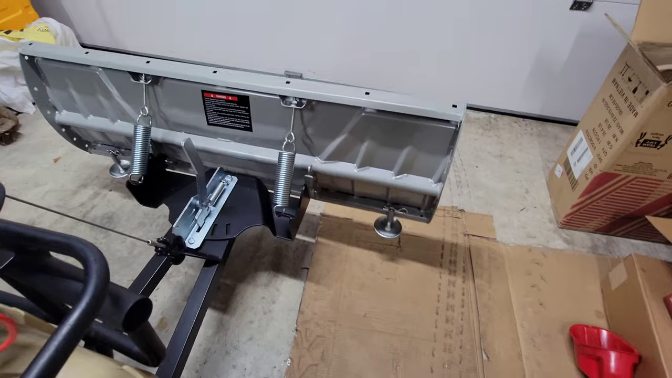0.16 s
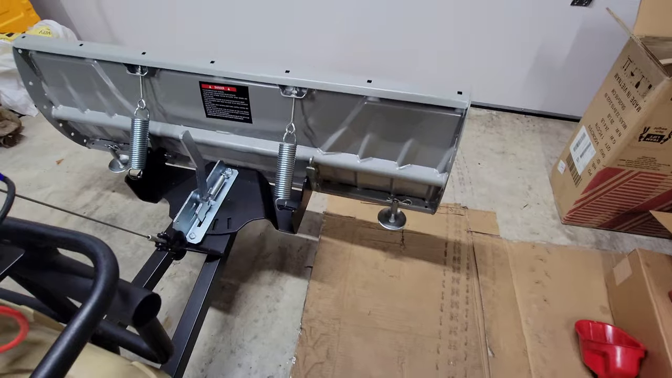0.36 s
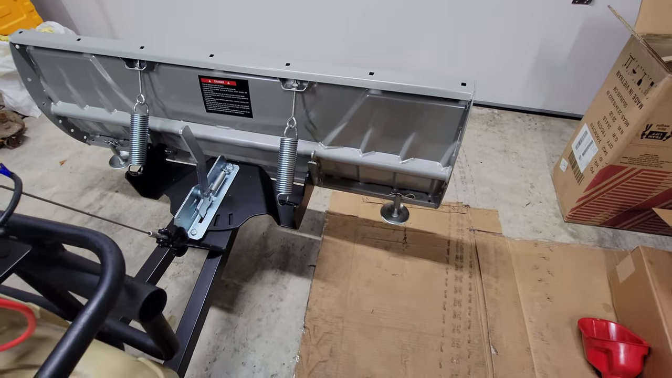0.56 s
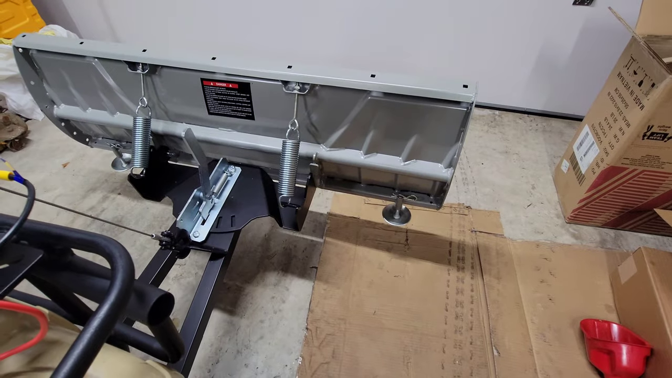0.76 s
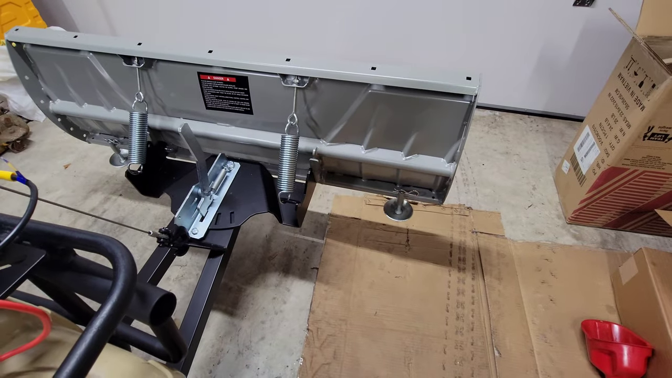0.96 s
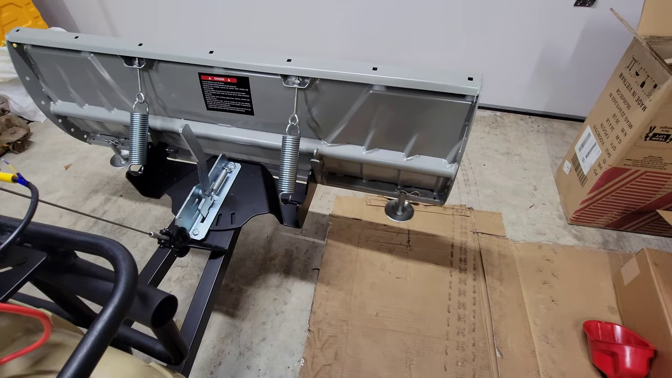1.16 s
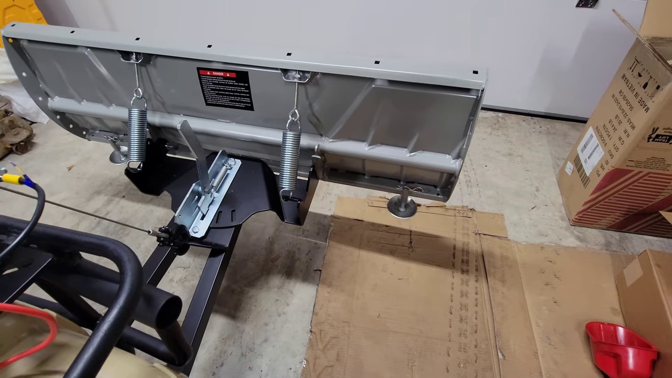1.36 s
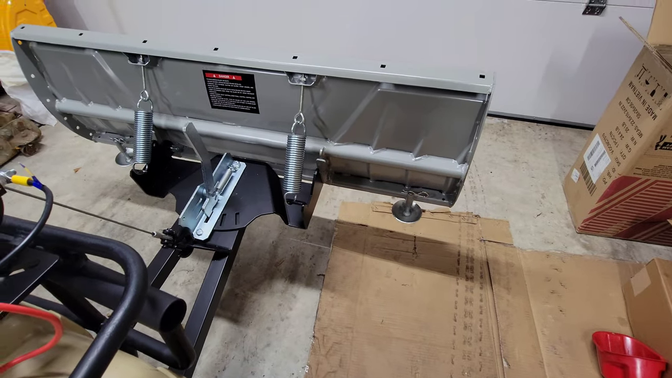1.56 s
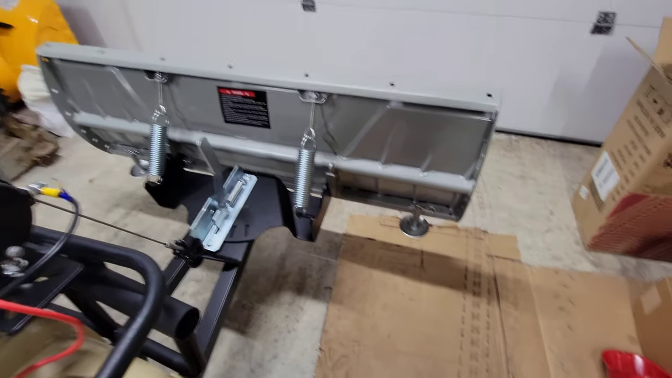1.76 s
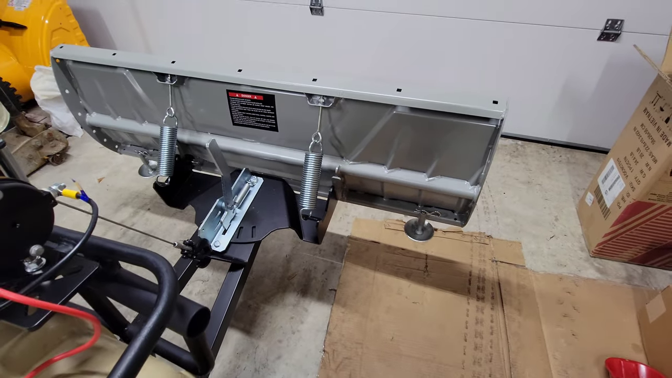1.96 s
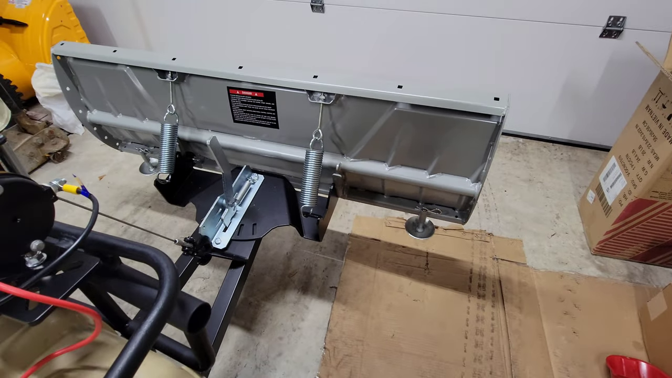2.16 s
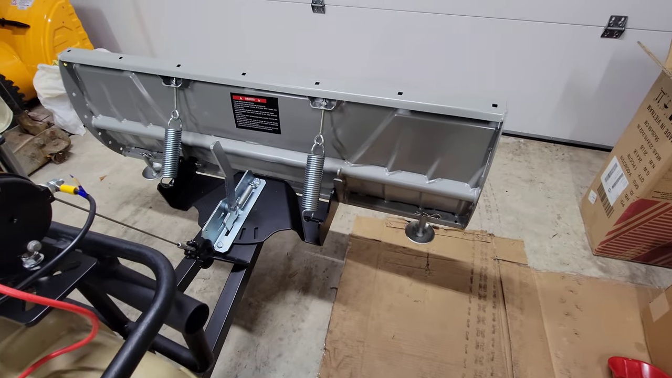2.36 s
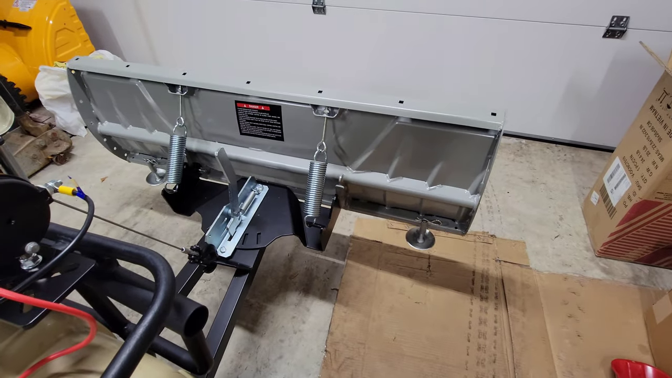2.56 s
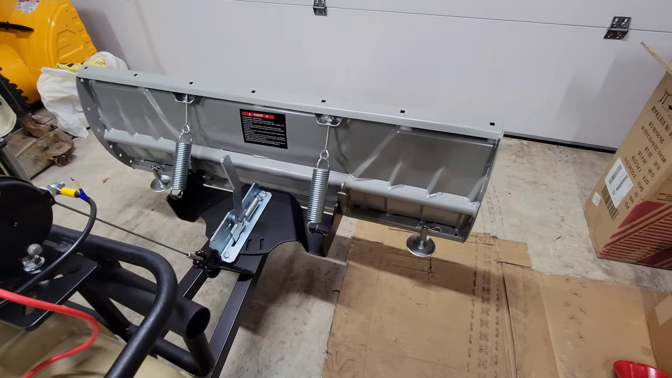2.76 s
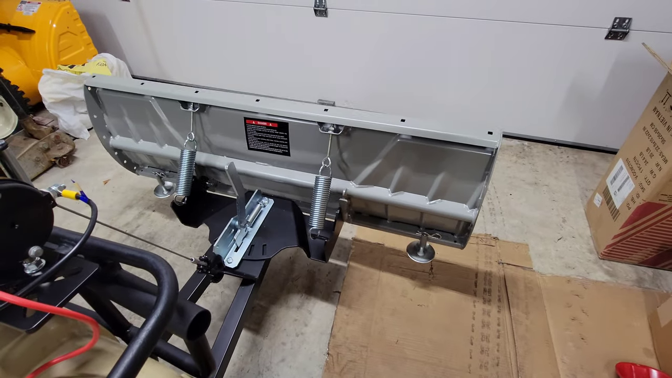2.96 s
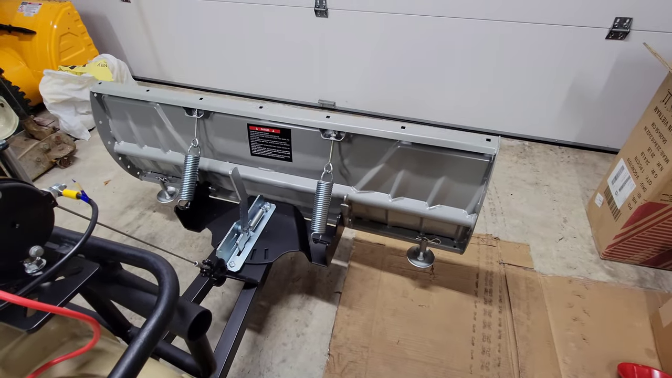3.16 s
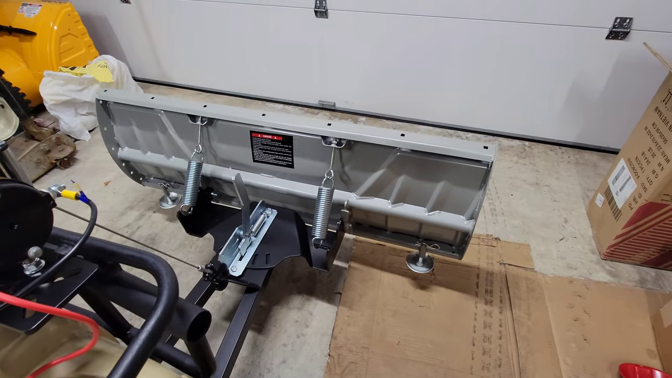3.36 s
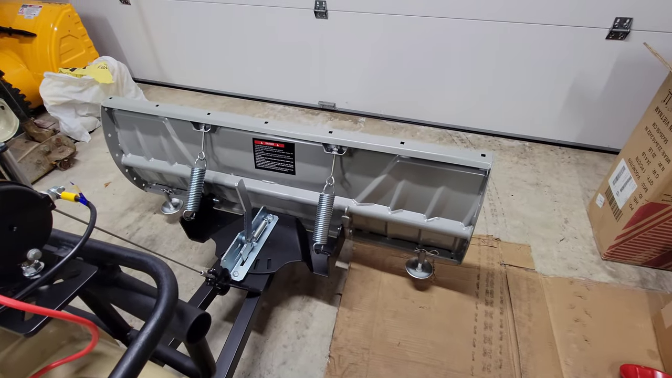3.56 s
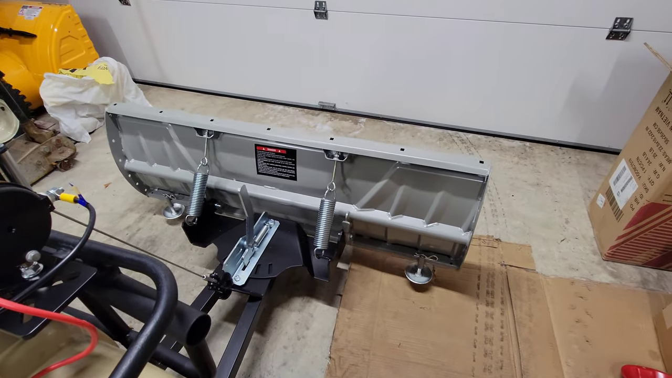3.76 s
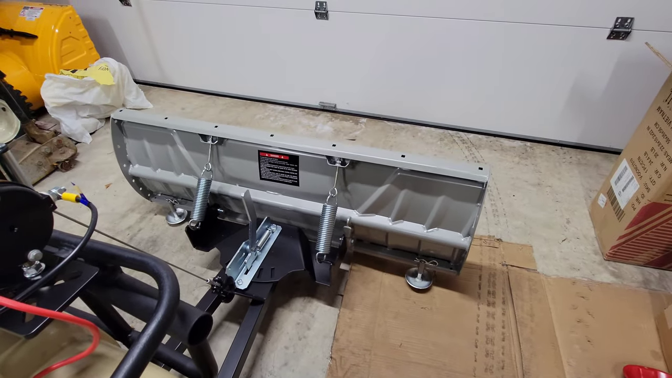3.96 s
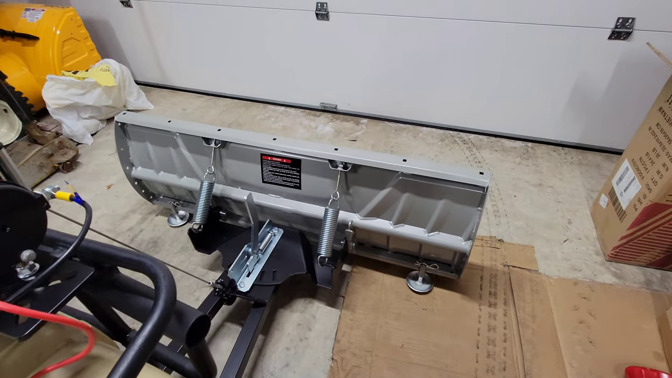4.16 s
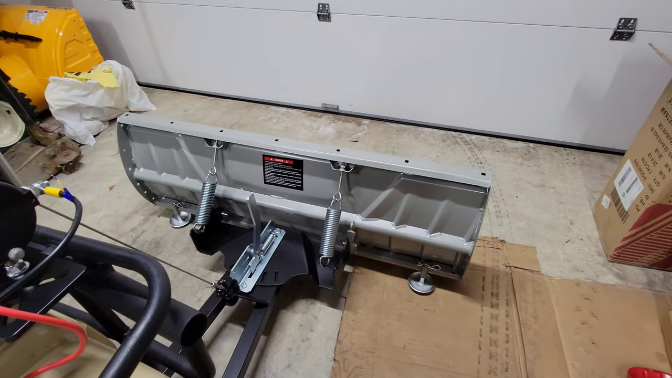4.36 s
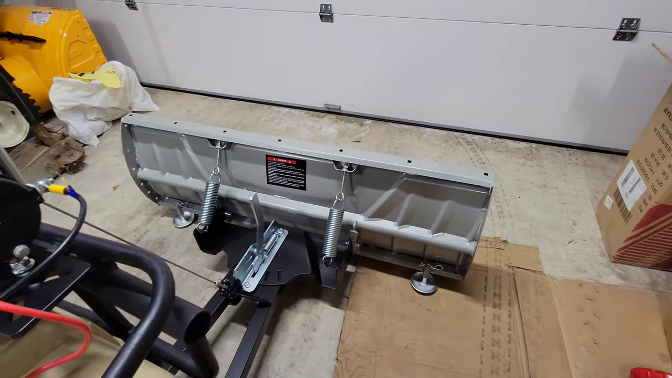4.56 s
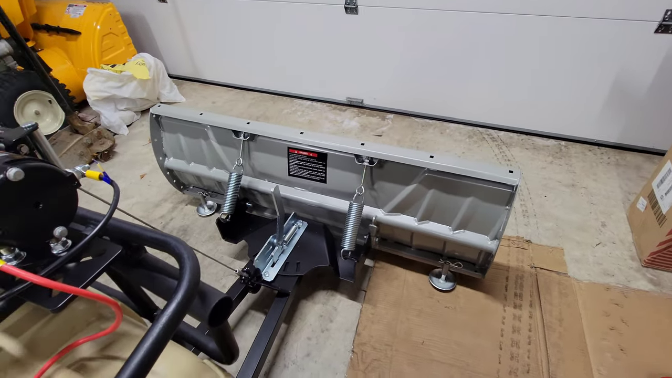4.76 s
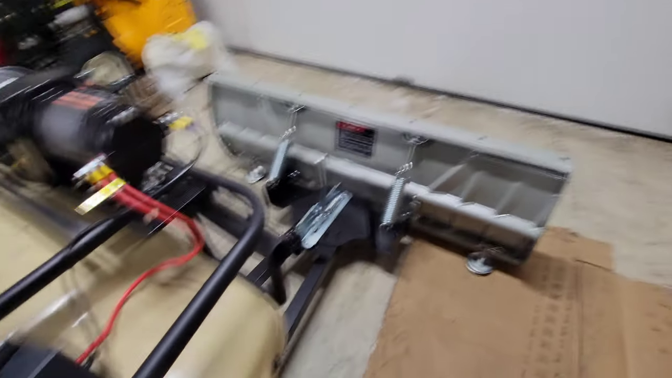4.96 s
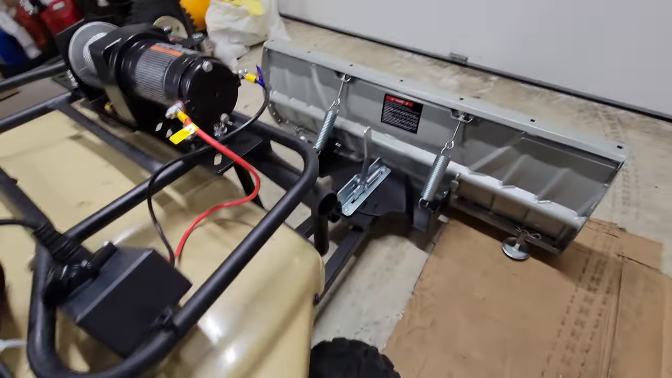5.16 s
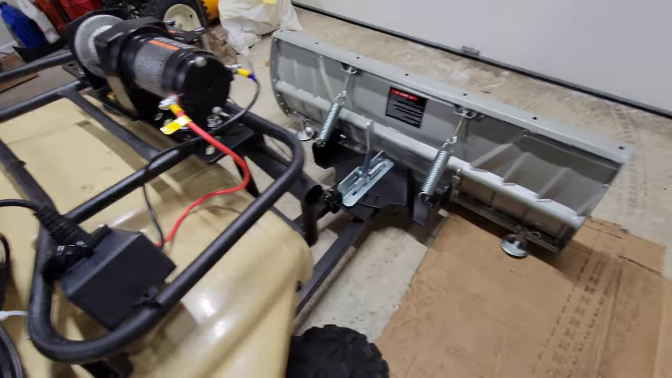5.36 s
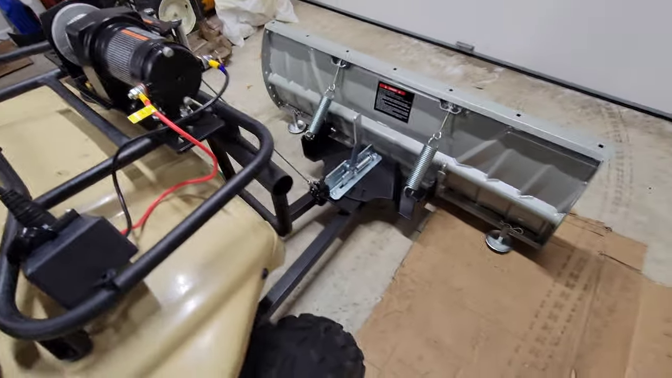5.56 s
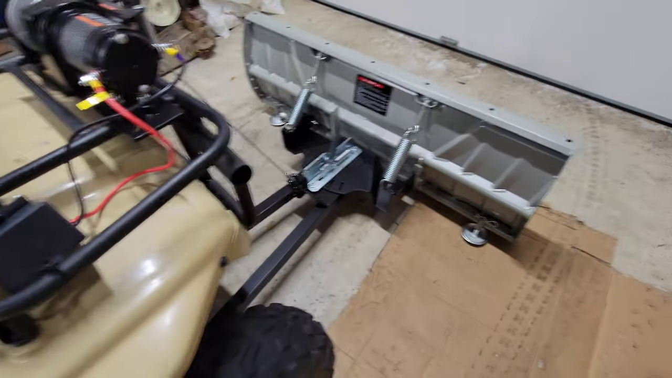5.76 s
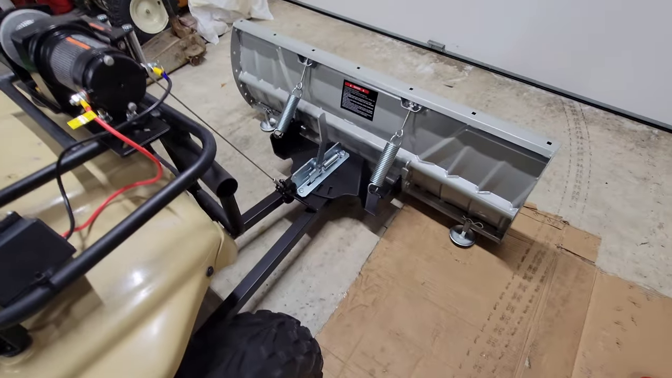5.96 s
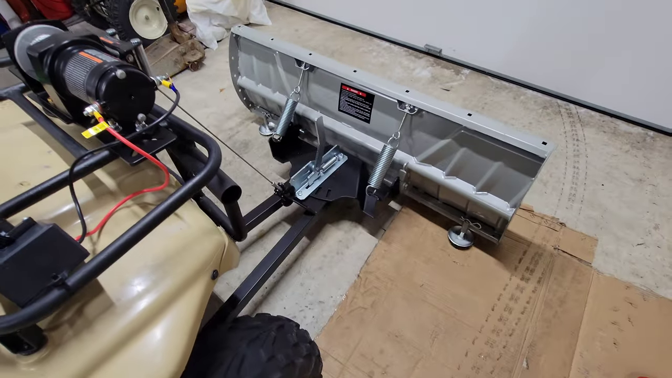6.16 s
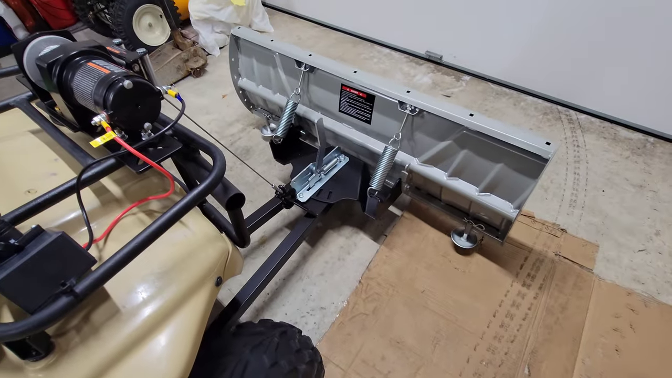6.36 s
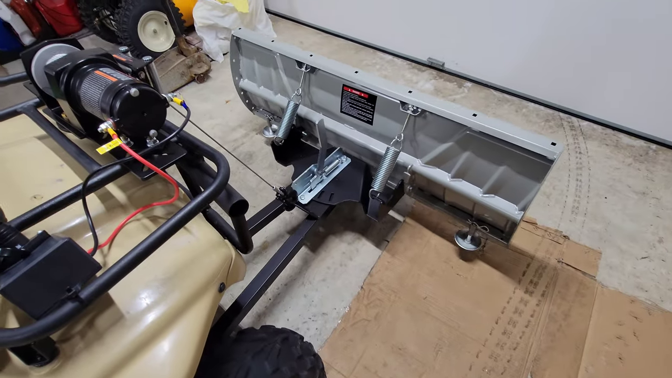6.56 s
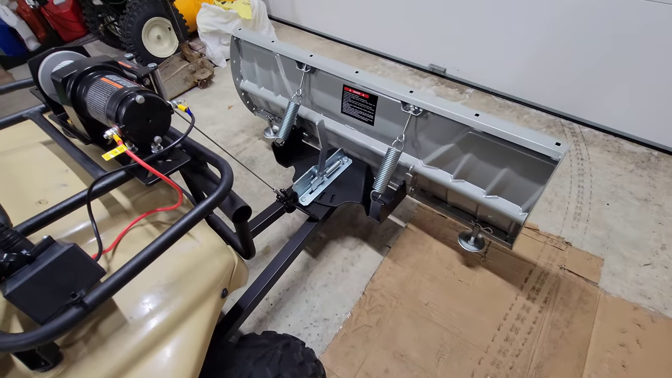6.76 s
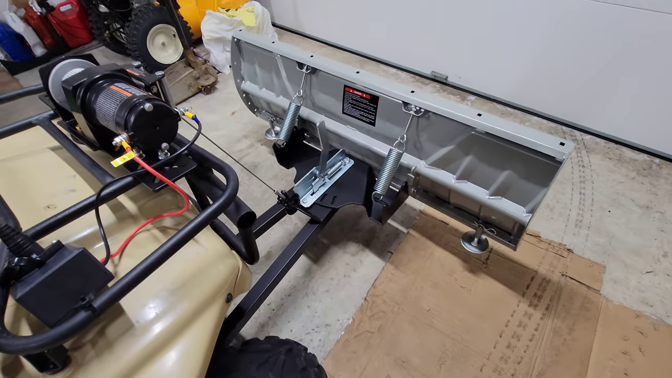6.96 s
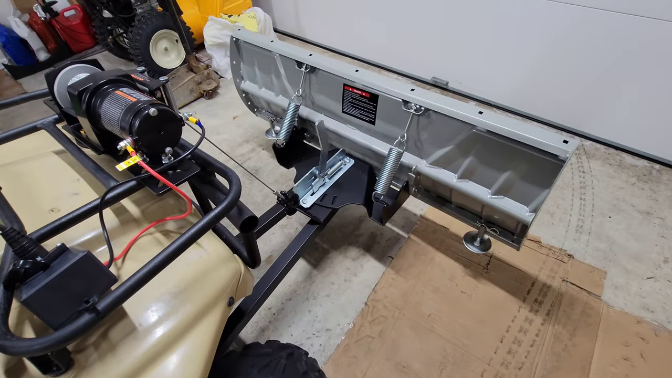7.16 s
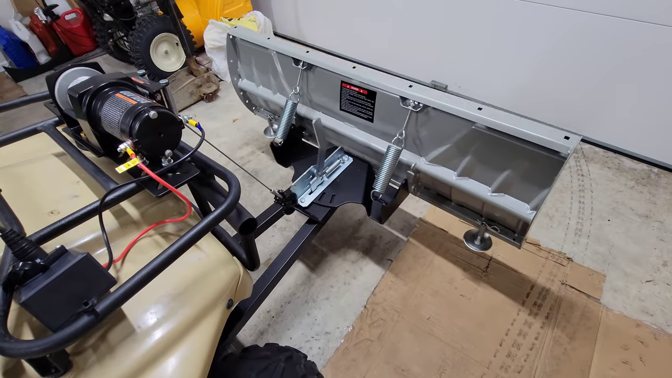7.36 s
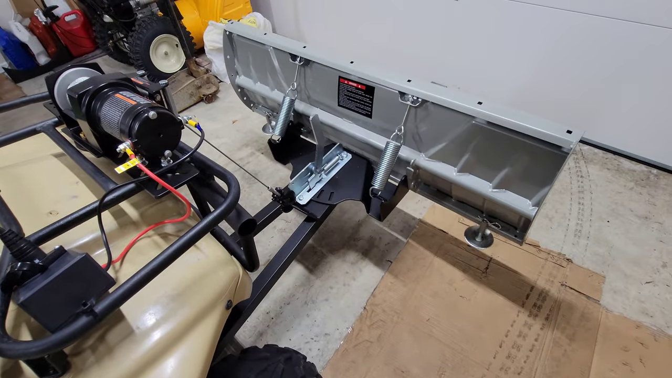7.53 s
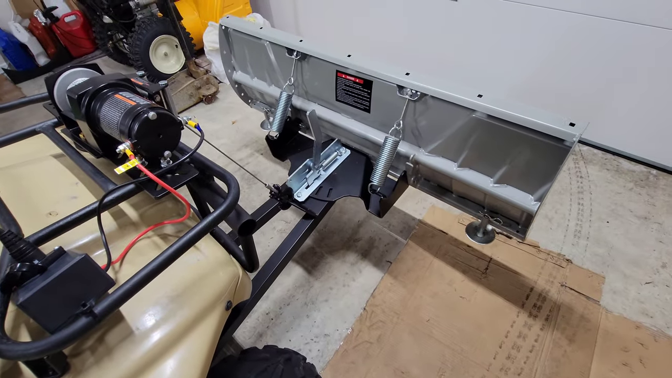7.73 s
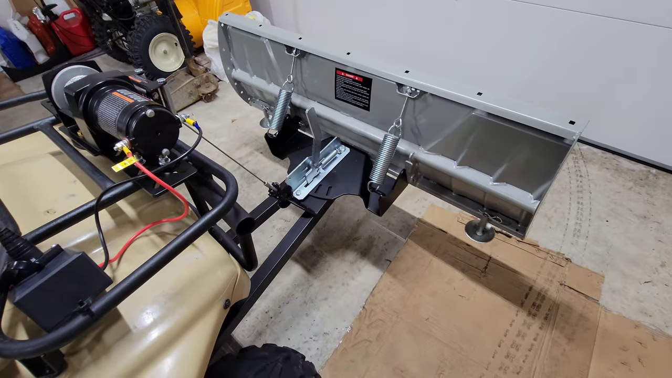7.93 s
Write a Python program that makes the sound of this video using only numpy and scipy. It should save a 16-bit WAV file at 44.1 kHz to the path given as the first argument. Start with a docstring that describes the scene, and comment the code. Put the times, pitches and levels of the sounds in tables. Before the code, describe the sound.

Quiet garage air, then at 0.2 s a tiny switch tick and hard contactor clack start an electric winch. Its whine sweeps up quickly into buzzing, gritty planetary-gear grinding, braking by about 0.65 s with a dull thud and reverberation. Similar shorter bursts come at 0.8-1.15 and 1.25-1.6 s, with a brief squeak in the last. After a fading echo, a longer lowering run starts at 2.25 s, slightly lower in pitch, throbbing and surging with rasps. At 4.15 s the steel blade lands on concrete in quick crunching, ringing contacts; the motor lightens to a cleaner whine and stops at 4.5 s. Near quiet follows, with a faint soft step at 5.15 s. At 5.87 s another clack begins a long lift, starting faster and lighter, settling into steady harsh whirring and dry scraping until power cuts at 7.8 s. Close handheld stereo, hard bare room.

```python
"""An electric winch on a quad bike moves a steel plow blade in a garage: three short lifts, one lowering, one long lift.
Each run starts with the clack of the contactor; shaft harmonics sweep up, whine and throb, and noise clashing
once a turn grinds like planetary gears until the motor brakes.
The blade, a set of decaying modes with a crunch, lands on the concrete floor near the end of the lowering.
Noise echoes with a decay of their own in each band make the bare room ring after every stop, over quiet air."""
import sys
import numpy as np
from scipy import signal
from scipy.fft import rfft, irfft, next_fast_len
from scipy.io import wavfile
from scipy.ndimage import map_coordinates

SR = 44100
rng = np.random.default_rng(int(sys.argv[2]) if len(sys.argv) > 2 else 0)


def store_pcm(level_fs):
    """Save levels as 16-bit WAV."""
    pcm = np.round(np.clip(level_fs, -1, 1) * 32767).astype(np.int16)
    wavfile.write(sys.argv[1], SR, np.atleast_2d(pcm).T)


N = 352468
T = np.arange(N) / SR  # seconds

# Motor runs. Each row: power on and off in seconds, spin-up time constant and braking time in seconds,
# direction (0 winding in, 1 paying out), nominal shaft speed in Hz, then relative levels in dB of the gears,
# whine against grinding, mount, scraping and upper whine harmonics, and the lead of the left port in ms.
RUNS = [(0.196, 0.551, 0.05, 0.14, 0, 341.7, -18.5, -2, -27.5, -38.5, -4, 0.4),
        (0.78, 1.05, 0.047, 0.128, 0, 339.6, -19, -3, -28.5, -37, -1.5, 0.4),
        (1.25, 1.457, 0.047, 0.17, 0, 341, -20.5, -1.5, -28, -32.5, -1, 0.39),
        (2.265, 4.52, 0.046, 0.045, 1, 319.7, -21.5, -3.5, -28.5, -45, 0, 0.59),
        (5.873, 7.818, 0.039, 0.13, 0, 337.8, -19.5, -3, -31, -41.5, -0.5, 0.3)]
# Skid shoes and blade edge touching the floor. Each row: start in seconds, relative level in dB.
LANDING = [(4.146, -11), (4.166, -13.5), (4.189, -18), (4.235, -28.5)]
# Housing rattled by the teeth while winding in. Each row: frequency in Hz, relative density in dB per Hz.
GRIND_IN = [(250, -83.5), (550, -3.5), (800, -1.5), (1300, 1.5), (2000, -1.5), (2500, -2.5), (3150, 2),
            (4200, -5), (5000, -4), (6500, -8.5), (8300, -20), (12000, -15.5), (15500, -41.5)]
# Dry scraping of drum and cable. Each row: frequency in Hz, relative density in dB per Hz.
SCRAPE = [(2500, -25), (5000, -4), (7000, -1.5), (8400, -6.5), (10500, -11.5), (12200, -5.5), (13500, -12),
          (15500, -20.5)]
# Vibration of the mount and rack. Each row: frequency in Hz, relative density in dB per Hz.
MOUNT = [(25, -48.5), (48, -40), (65, 0), (110, -5.5), (170, -7.5), (260, -1.5), (320, 4), (420, 1),
         (600, -8), (1000, -6.5), (2500, -65.5)]
# Quiet room air. Each row: frequency in Hz, relative density in dB per Hz.
AIR = [(25, -16), (50, -9), (90, 6), (140, 1), (320, -3), (500, -10.5), (1000, -16), (2000, -18.5),
       (4000, -25.5), (8000, -44.5), (15000, -49.5)]
TURNS_PER_ROUND = 16  # shaft turns in one round of the planet carrier


def amp(db):
    """Decibels to gain."""
    return 10 ** (np.asarray(db) / 20)


def unit(x):
    """Scale to rms 1."""
    return x / np.sqrt(np.mean(x ** 2) + 1e-20)


def along(points, hz):
    """Rows of frequency in Hz and value, read on a log frequency axis."""
    f, v = np.transpose(points)
    return np.interp(np.log(hz + 1), np.log(f + 1), v)


def wobble(rate):
    """A smooth random curve, rate knots a second."""
    coarse = T[::32]
    knots = rng.standard_normal(4096)
    curve = map_coordinates(knots, [coarse * rate], mode="wrap")
    return np.interp(T, coarse, curve)


def filtered(x, response):
    """x times a response of frequency."""
    m = next_fast_len(N + SR // 4)
    hz = np.fft.rfftfreq(m, 1 / SR)
    return irfft(rfft(x, m) * response(hz), m)[..., :N]


def coloured(spectrum, gate=1):
    """Gated noise through a spectrum, scaled to rms 1."""
    noise = gate * rng.standard_normal(N)
    return unit(filtered(noise, lambda hz: amp(along(spectrum, hz))))


def fade(t, t60):
    """Exponential decay by 60 dB in t60 seconds."""
    return np.exp(-np.log(1000) * t / t60)


def ring(modes, t):
    """Decaying modes, struck at new strengths and phases each time."""
    out = 0
    for hz, db, t60 in modes:
        strength = amp(db + 2 * rng.normal())
        out = out + strength * fade(t, t60) * np.sin(2 * np.pi * (hz * t + rng.random()))
    return out


def add(track, s, sound):
    """Mix a sound in at s seconds."""
    start = round(s * SR)
    track[start:start + len(sound)] += sound[:N - start]


def swells(events):
    """Bell-shaped swells of gain from rows of centre in seconds, level in dB and half-length in seconds."""
    return sum(amp(db) * np.exp(-2 * ((T - s) / length) ** 2) for s, db, length in events)


def per_run():
    """The settings of the latest run at every sample, one array for each column."""
    table = np.array(RUNS)
    latest = np.maximum(np.searchsorted(table[:, 0], T) - 1, 0)
    return table[latest].T


def shaft():
    """Share of full speed, power left, speed in Hz and turns made: a quick spin-up, a pull, a braked stop."""
    # The long lift starts on a slack cable and slows as the blade's weight comes on.
    # Each row: time in seconds, Hz above the run's nominal speed.
    overspeed_points = [(5.9, 22), (6.11, 20), (6.22, 11.5), (6.3, 8.5), (6.55, 7), (6.66, 2.5),
                        (6.85, 0.5), (7.1, -0.55), (7.35, 0.5), (7.62, -2.5), (7.78, 2.5)]
    on, off, spin_up, coast, _, speed_hz, *_ = per_run()
    powered = np.clip(1 - (T - off) / coast, 0, 1)
    share = (1 - np.exp(-np.maximum(T - on, 0) / spin_up)) * powered
    overspeed = (T > RUNS[-1][0]) * np.interp(T, *np.transpose(overspeed_points))
    waver = 1 + 0.001504 * wobble(25) + 0.00197 * wobble(7)
    hz = (speed_hz + overspeed) * share * waver
    return share, powered, hz, np.cumsum(hz) / SR


def whine(turns, hz, pace, age, paying_out, treble_db, light_db, rough, flutter_hz):
    """Shaft harmonics sweep through the housing's resonance, throb with the carrier and flutter with uneven teeth."""
    # Whine winding in and paying out. Each row: multiple of the nominal shaft speed, relative level in dB.
    whine_in = [(0.6, -22), (1, -16), (2, -15), (3, -11), (4, -6), (5, -5), (6, -4), (7, -9.5), (8, -4.5),
                (9, -2), (10, -3.5), (11, -7), (12, -1), (13, -5.5), (14, -14.5), (15, -16.5), (16, -17),
                (17, -19), (18, -17), (19, -18), (20, -23)]
    whine_out = [(0.6, -14), (1, -16), (2, -11), (3, -6), (4, -4), (5, -10), (6, -9), (7, -6), (8, -8),
                 (9, -1), (10, -4), (11, -9), (12, -2), (13, -7.5), (14, -10.5), (15, -11), (16, -18),
                 (17, -18), (18, -14), (19, -20), (20, -15)]
    # The housing sings under the starting torque, then settles.
    # In order: frequency and half-width in Hz, starting boost in dB, settling time constant in seconds.
    housing = (3130, 65, 8, 0.48)
    housing_hz, width_hz, housing_db, settle_s = housing
    singing_db = housing_db * np.exp(-age / settle_s)
    # depth of each harmonic's throb: it deepens as the blade rises
    beat_in, beat_in_per_s, beat_out = 0.44, 0.18, 0.65
    beat = np.where(paying_out, beat_out, beat_in + beat_in_per_s * age)
    flutter_build_s = 0.17  # the whine sweeps up cleanly and only then starts to flutter
    rough = rough * (1 - np.exp(-age / flutter_build_s))
    out = np.zeros(N)
    for order in range(1, len(whine_in) + 1):
        # levels belong to the frequency, so a harmonic changes level as it sweeps
        in_db = np.interp(order * pace, *np.transpose(whine_in))
        out_db = np.interp(order * pace, *np.transpose(whine_out))
        db = np.where(paying_out, out_db, in_db)
        resonant = 1 / (1 + ((order * hz - housing_hz) / width_hz) ** 2)
        upper = np.clip((order - 10) / 2, 0, 1)
        db = db + singing_db * resonant + light_db * (1 - resonant) + treble_db * upper
        angle = 2 * np.pi * (order * turns + rng.random())
        # each harmonic swells at its own point of the planet carrier's round
        swell = 1 + beat * np.sin(2 * np.pi * (turns / TURNS_PER_ROUND + rng.random()))
        steady = (1 + rough * wobble(flutter_hz)) * np.cos(angle)
        flutter = rough * wobble(flutter_hz) * np.sin(angle)
        out += amp(db) * swell * (steady + flutter)
    return unit(out)


def winch(share, powered, hz, turns):
    """Motor and gears: whine, tooth clatter, scraping and the humming mount all follow the shaft."""
    # Brief surges of whine and grinding, with rasps; while lowering roughly once per slow planetary round.
    # Each row: centre in seconds, gear surge in dB, rasp in dB, half-length in seconds.
    surges = [(0.495, -17.5, -30, 0.024), (0.895, -13.5, -24.5, 0.031), (1.019, -22, -28, 0.029),
              (1.421, -9, -24, 0.023), (2.458, -6, -35, 0.052), (2.601, -5, -31, 0.026),
              (2.928, -13.5, -42.5, 0.04), (3.088, -10, -36, 0.042), (3.225, -2.5, -29, 0.03),
              (3.366, -14, -33, 0.025), (3.411, -3.5, -32.5, 0.03), (3.526, -12, -32.5, 0.05),
              (3.669, -1.5, -26, 0.031), (3.836, -3, -33.5, 0.035)]
    # Housing rattled while paying out. Each row: frequency in Hz, relative density in dB per Hz.
    grind_out = [(250, -36), (550, -0.5), (800, -6), (1200, -5.5), (2000, -5), (2400, -2.5), (3100, -1),
                 (4200, -6.5), (5200, -6.5), (6500, -14.5), (8300, -21.5), (12000, -25), (15500, -43.5)]
    # Hum of the planetary stages. Each row: multiple of the shaft speed, relative level in dB.
    gear_tones = [(0.876, -11), (1.183, -7), (1.56, -4)]
    on, _, _, _, direction, speed_hz, gear_db, whine_db, mount_db, scrape_db, treble_db, _ = per_run()
    surge = swells((s, db, length) for s, db, _, length in surges)
    rasp = swells((s, db, length) for s, _, db, length in surges)
    paying_out, age = direction > .5, np.maximum(T - on, 0)
    mesh_s = 0.025  # the gears take up their play before they grind
    meshed = 1 - np.exp(-(age / mesh_s) ** 2)
    # once the blade rests on the floor the cable goes slack and unloads gears and mount
    unload_s, unloaded_gears_db, unloaded_mount_db = 0.11, -4, -6.5
    slack = paying_out * np.clip((T - LANDING[0][0]) / unload_s, 0, 1)

    # the gears work harder while the shaft accelerates, and ease as the blade sinks
    start_torque_db, start_torque_s, lowering_db_per_s = 11, 0.065, -0.99
    effort_db = start_torque_db * np.exp(-age / start_torque_s) + lowering_db_per_s * age * paying_out
    # the long lift starts softly, its cable still slack
    slack_start_db, slack_start_s = -8.5, 0.07
    effort_db = effort_db + (T > RUNS[-1][0]) * slack_start_db * np.exp(-age / slack_start_s)
    load = meshed * (1 + surge) * amp(gear_db + effort_db + unloaded_gears_db * slack)

    # the planet carrier loads the shaft once per round: it throbs and swings the pitch
    carrier = np.sin(2 * np.pi * turns / TURNS_PER_ROUND)
    throb = amp(1.0 * carrier + 1.47 * wobble(35) + 0.88 * wobble(12))
    warble_turns = 0.015  # how far the load swings the shaft ahead and behind
    swung = turns + warble_turns * carrier

    start_whine_db, start_whine_s = 7, 0.1
    pressing_db = start_whine_db * np.exp(-age / start_whine_s)
    light_load_db_per_hz = -0.1  # a lightly loaded, overspeeding motor whines less
    light_db = light_load_db_per_hz * np.maximum(hz - speed_hz, 0)
    tones = whine(swung, hz, hz / speed_hz, age, paying_out, treble_db, light_db, rough=0.33, flutter_hz=44.91)
    surge_whine = 0.5  # a surge raises the whine more than the grinding
    tones = tones * amp(1.0 + pressing_db - 11.0 * slack) * share ** 2.66 * (1 + surge_whine * surge)

    # teeth clash once a turn, each time with a new force; they unload as soon as the power is cut
    clash = amp(1.8 * np.cos(2 * np.pi * turns) + 1.5 * wobble(330))
    grind_paying_out = amp(-0.5) * coloured(grind_out, clash)
    grind_winding_in = amp(-3.0) * coloured(GRIND_IN, clash)
    grind = np.where(paying_out, grind_paying_out, grind_winding_in)
    gears = load * powered ** 5.8 * (grind * share ** 2.7 + amp(whine_db) * tones)

    lift_scrape_db_per_s = 3  # the cable rubs harder as the blade rises
    steady_rub = amp(scrape_db + lift_scrape_db_per_s * age * ~paying_out)
    rubbing = np.hypot(steady_rub, rasp)
    scrape = rubbing * amp(4.5 + 0.99 * carrier) * share ** 2.7 * coloured(SCRAPE, clash)

    hum = unit(sum(amp(db) * np.sin(2 * np.pi * multiple * turns) for multiple, db in gear_tones))
    hum_in_db, hum_out_db = -4.5, -9.5  # against the mount's rumble
    hum = hum * amp(np.where(paying_out, hum_out_db, hum_in_db)) * share ** 4
    # the heavy rack's deep rumble builds up slowly
    rumble_hz, rumble_build_s = 128.6, 0.21
    shake = coloured(MOUNT, amp(1.9 * carrier))
    deep = filtered(shake, lambda f: 1 / (1 + (f / rumble_hz) ** 4))
    built_up = shake - deep * np.exp(-age / rumble_build_s)
    rumble = amp(unloaded_mount_db * slack) * share ** 0.5 * built_up
    mount = meshed * amp(mount_db) * (rumble + hum)
    return throb * (gears + scrape + mount)


def freewheel(powered, turns, level_db, rise_s):
    """With the cable slack the motor sings on a few clean harmonics until it is switched off."""
    # Whine of the motor running free. Each row: multiple of the shaft speed, relative level in dB.
    whine_free = [(4, -10), (6, 0), (12, -14), (15, -17)]
    paying_out = per_run()[4] > .5
    free = paying_out * np.clip((T - LANDING[0][0]) / rise_s, 0, 1) * powered
    tones = sum(amp(db) * np.sin(2 * np.pi * order * turns) for order, db in whine_free)
    return amp(level_db) * free * tones


def drone(share, turns, waver_db):
    """Shaft imbalance drones once a turn; a tone at three times that swells with the slow planetary stage."""
    # Clean shaft tones. Each row: time in seconds, once-a-turn and three-times-a-turn relative levels in dB.
    drone_levels = [(0.3, -50, -33.5), (0.55, -31, -30), (0.85, -39, -26), (1.02, -33.5, -32),
                    (1.4, -41, -36), (2.42, -23.5, -36), (2.72, -30, -27.5), (2.92, -34, -28.5),
                    (3.5, -32.5, -18), (4.1, -36.5, -34.5), (4.5, -28, -41), (5.95, -26, -39),
                    (6.28, -29.5, -29.5), (6.42, -24.5, -29.5), (6.72, -19.5, -32.5), (6.9, -29, -28.5),
                    (7.55, -33.5, -29), (7.82, -24.5, -35.5)]
    s, first_db, third_db = np.transpose(drone_levels)
    paying_out = per_run()[4] > .5
    # shaft turns per slow round, time of a crest in seconds, depth of the swell
    turns_per_slow_round, crest_s, slow_swell = 47.5, 3.55, 0.74
    crest_turns = np.interp(crest_s, T, turns)
    slow = np.cos(2 * np.pi * (turns - crest_turns) / turns_per_slow_round)

    def tone(order, db):
        """A harmonic of the shaft at a wavering level."""
        level = amp(np.interp(T, s, db) + waver_db * wobble(22))
        return level * np.sin(2 * np.pi * order * turns)

    first = tone(order=1, db=first_db)
    third = (1 + slow_swell * slow * paying_out) * tone(order=3, db=third_db)
    return share ** 3 * (first + third)


def squeaks(pitch_hz, width_hz):
    """Short squeaks: swells of narrow noise near the housing's strongest resonance; the first brightens the
    whine as it sweeps through that resonance in the first spin-up."""
    # Each row: centre in seconds, relative level in dB, half-length in seconds.
    squeak_events = [(0.288, -17, 0.018), (1.425, -19, 0.025), (2.45, -25, 0.024), (2.502, -22.5, 0.022),
                     (3.425, -24, 0.02), (4.44, -28.5, 0.019), (5.916, -37, 0.012), (7.52, -23, 0.022)]
    noise = rng.standard_normal(N)
    squeal = filtered(noise, lambda hz: 1 / (1 + ((hz - pitch_hz) / width_hz) ** 2))
    return swells(squeak_events) * unit(squeal)


def switching(thump_hz):
    """The switch ticks, the contactor slams and bounces and clicks open after the lowering, and the starting
    torque jolts the rack."""
    # Contactor closing. Each row: start in seconds, relative level in dB, frame thump against it in dB.
    contactor = [(0.1985, -6, -30), (0.7806, -8.5, -26.5), (1.25, -7.5, -26), (2.2647, -11.5, -23),
                 (5.8709, -10, -26)]
    # Its plunger and case. Each row: nominal frequency in Hz, relative level in dB, nominal t60 in seconds.
    plunger = [(960, -15.5, 0.015), (2220, -15, 0.012), (2870, -9.5, 0.017), (3500, -7.5, 0.014),
               (4220, -2, 0.014), (4860, -2.5, 0.016), (6100, -8.5, 0.0096), (11540, -33.5, 0.02)]
    # Light ticks of the rocker switch, and the contactor clicking open as the lowering stops. Each row: start
    # in seconds, relative level in dB.
    switch = [(0.189, -35), (0.771, -28), (1.241, -28.5), (4.522, -24.5), (4.909, -61.5), (5.861, -37.5)]
    out, cracks, ticks, t = np.zeros(N), np.zeros(N), np.zeros(N), np.arange(SR // 4) / SR
    for s, db, thump_db in contactor:
        # slam and bounce: seconds late, level in dB
        for late, bounce_db in [(0.0005, -8.5), (0.004, -19.5)]:
            stretched = t * (1 + 0.037 * rng.normal())  # shifts pitch and decay together
            add(out, s + late, amp(db + bounce_db) * ring(plunger, stretched))
            add(cracks, s + late, amp(db + bounce_db) * fade(t, 0.03))
        thump = fade(t, 0.22) * np.sin(2 * np.pi * thump_hz * t)
        add(out, s + 0.0021, amp(db + thump_db + 5.5) * thump)
    for s, db in switch:
        add(ticks, s, amp(db) * fade(t, 0.021))
    return out + amp(0.5) * cracks * coloured(GRIND_IN) + ticks * coloured(SCRAPE)


def frame(x):
    """Lightly damped steel tubes and springs pick up the vibration and ring on."""
    # Each row: frequency in Hz, width in Hz, relative level in dB.
    tubes = [(579, 2.4, 0.5), (1010, 49, -10), (2100, 40, -7)]
    return sum(amp(db) * signal.lfilter(*signal.iirpeak(hz, hz / width, SR), x) for hz, width, db in tubes)


def landing():
    """The blade meets the floor in several contacts: each crunches and rings the steel."""
    # The steel blade. Each row: frequency in Hz, relative level in dB, t60 in seconds.
    blade = [(81.5, -18.5, 0.5), (168, -9, 0.55), (224.3, -7.5, 0.94), (344.4, -11, 0.2), (487, -9, 0.19),
             (583, 2, 0.45), (669, -2, 0.31), (716, -33.5, 4.7), (1020, -12, 0.55), (1200, -3.5, 0.25),
             (1755, -2, 0.14), (1910, -4, 0.24), (2180, -7.5, 0.23), (2700, 1, 0.11), (3060, -1.5, 0.38),
             (3600, -14, 0.25), (3950, -23.5, 0.25)]
    # Crunch of steel on concrete. Each row: frequency in Hz, relative density in dB per Hz.
    crunch_colour = [(45, -22.5), (75, -3.5), (200, -2.5), (550, -8), (800, -5.5), (2000, -5), (3000, -4.5),
                     (4500, -13), (7000, -16), (9000, -32), (15000, -28.5)]
    steel, crunch, t = np.zeros(N), np.zeros(N), np.arange(2 * SR) / SR
    for s, db in LANDING:
        onset = amp(db) * (1 - np.exp(-t / 0.0024))
        add(steel, s, amp(-9) * onset * ring(blade, t))
        add(crunch, s, onset * fade(t, 0.17))
    return steel + crunch * coloured(crunch_colour)


def stop_thuds(thud_t60):
    """At every stop the rack thuds; after the lifts the hanging blade rings on."""
    # Each row: start in seconds, ring of the blade and thud of the rack in relative dB.
    stops = [(0.595, -32, -26), (1.06, -49, -30), (1.51, -34, -25.5), (4.524, -58, -25), (7.84, -33, -31)]
    # The blade hanging on its springs. Each row: frequency in Hz, relative level in dB, t60 in seconds.
    hanging = [(302.8, 2.5, 1.3), (394, -13, 1.5), (593, -15, 1.4), (670, -6, 1.8)]
    steel, thud, t = np.zeros(N), np.zeros(N), np.arange(2 * SR) / SR
    for s, ring_db, thud_db in stops:
        onset = 1 - np.exp(-t / 0.004)
        add(steel, s, amp(ring_db) * onset * ring(hanging, t))
        add(thud, s, amp(thud_db) * onset * fade(t, thud_t60))
    return steel + thud * coloured(MOUNT)


def footstep():
    """One soft step on the concrete, back from the blade: a short fading burst of noise."""
    # In order: start in seconds, relative level in dB, t60 in seconds.
    step = (5.147, -45, 0.06)
    s, db, t60 = step
    t = np.maximum(T - s, 0)
    return amp(db) * (1 - np.exp(-t / 0.002)) * fade(t, t60) * coloured(AIR)


def room_air():
    """Quiet, slowly wavering noise of the room, partly shared by both ports and partly separate."""
    shared = coloured(AIR)
    separate = np.array([coloured(AIR), coloured(AIR)])
    return amp(-52.5 + 1.1 * wobble(4.3)) * (shared + 0.33 * separate)


def tail():
    """One answer of the walls, from all sides: alike in both ports only in the bass."""
    # Garage reverberation. Each row: frequency in Hz, t60 in seconds.
    reverberation = [(80, 0.28), (300, 0.51), (1000, 0.65), (3000, 0.7), (6000, 0.52), (12000, 0.31)]
    hz, t = np.fft.rfftfreq(256, 1 / SR)[:, None], np.arange(300) * 128 / SR
    a, b = rng.standard_normal((2, 2, len(hz), len(t)))
    mid, side = (a + 1j * b) * fade(t, along(reverberation, hz))
    alike = np.sinc(hz / 950)
    mid, side = mid * np.sqrt(1 + alike), side * np.sqrt(1 - alike)
    pair = signal.istft(np.array([mid + side, mid - side]), SR, nperseg=256)[1]
    return pair / np.linalg.norm(pair[0])


def garage(x, wet_db, lead_ms):
    """Direct sound reaches the left port first; echoes keep changing as the hand-held microphone drifts."""
    lead = np.round(lead_ms * SR / 1000).astype(int)
    late = np.clip(np.arange(N) - lead, 0, N - 1)
    # overlapping stretches of sound, each with a new answer of the walls
    hop = SR // 3
    window = np.sin(np.pi * np.arange(2 * hop) / (2 * hop))
    padded, walls = np.pad(x, (hop, 2 * hop)), np.zeros((2, N + 3 * SR))
    for start in range(0, N + hop, hop):
        stretch = padded[start:start + 2 * hop] * window
        echo = signal.fftconvolve(stretch[None], tail(), axes=1)
        walls[:, start + SR // 200:][:, :echo.shape[1]] += echo  # echoes come 5 ms late
    return np.array([x, x[late]]) + amp(wet_db) * walls[:, hop:hop + N]


def scene():
    """Winch, switchgear and blade in the garage, over room air; the close rack is heard drier."""
    share, powered, hz, turns = shaft()
    near = winch(share, powered, hz, turns) + squeaks(pitch_hz=3080, width_hz=104) + switching(thump_hz=209)
    machine = garage(near + frame(near), wet_db=-1.5, lead_ms=per_run()[-1])
    close = drone(share, turns, waver_db=3.0) + stop_thuds(thud_t60=0.18)
    rack = garage(close, wet_db=-7.5, lead_ms=0.41)
    free = garage(freewheel(powered, turns, level_db=-33.5, rise_s=0.36), wet_db=-3.5, lead_ms=0.24)
    floor = garage(landing() + footstep(), wet_db=-2.0, lead_ms=0.1)
    return amp(-2.0) * (machine + rack) + free + floor + room_air()


def record(dry):
    """Silence before start_s; each port has its own colour; peaks are rounded; the top of the band is cut."""
    # Microphone ports. Each row: frequency in Hz, left minus right in dB.
    port_colour = [(60, 2), (200, 0.5), (400, 2), (700, 3.5), (1300, -1), (2400, -2), (4400, -9), (8100, 6),
                   (12000, -1.5)]
    start_s, top_hz = 0.07, 15500
    halves = np.array([[.5], [-.5]])  # each port takes half the difference
    ports = filtered(dry * (T > start_s), lambda hz: amp(along(port_colour, hz) * halves))
    rounded = ports / (1 + np.abs(ports / 0.9) ** 6) ** (1 / 6)
    return filtered(rounded, lambda hz: hz < top_hz)


dry = scene()
out = record(dry)
store_pcm(out)
```